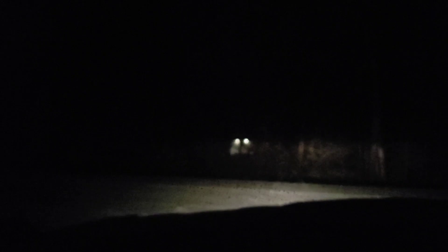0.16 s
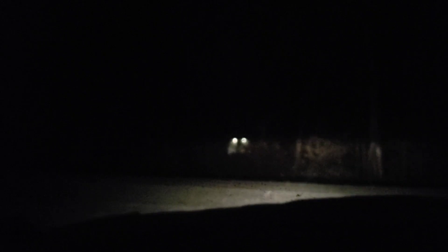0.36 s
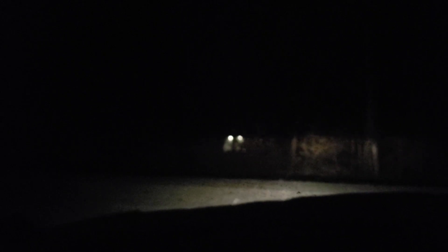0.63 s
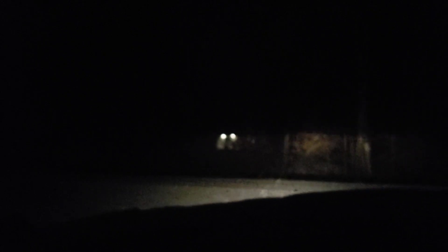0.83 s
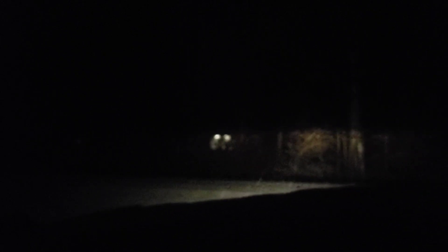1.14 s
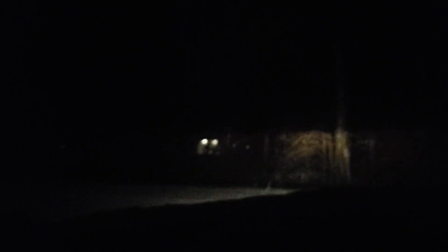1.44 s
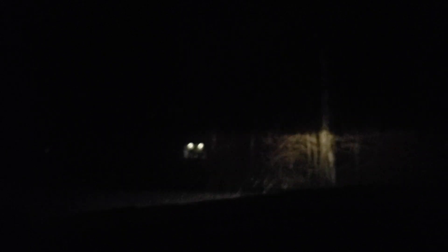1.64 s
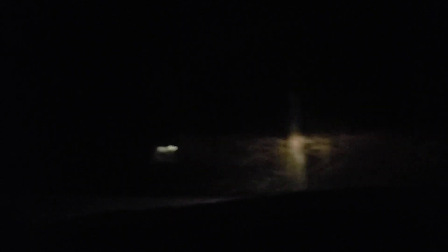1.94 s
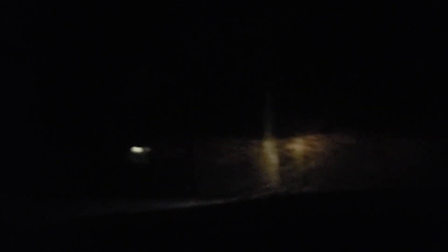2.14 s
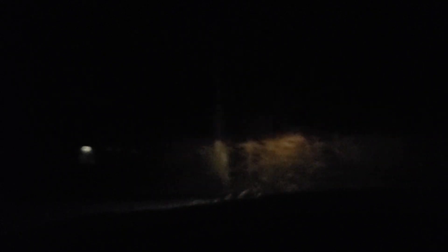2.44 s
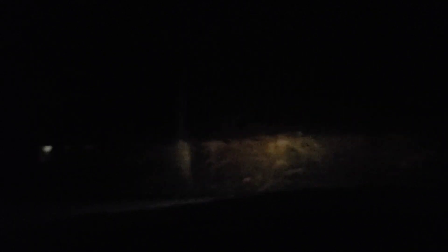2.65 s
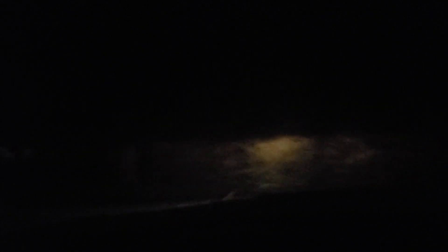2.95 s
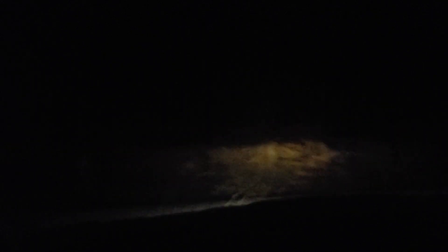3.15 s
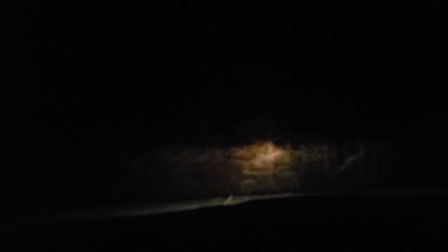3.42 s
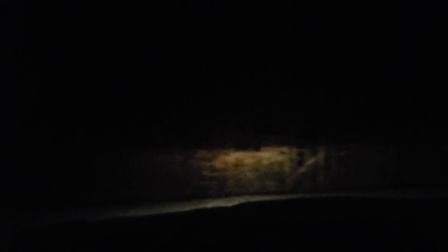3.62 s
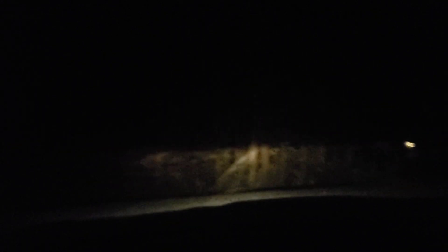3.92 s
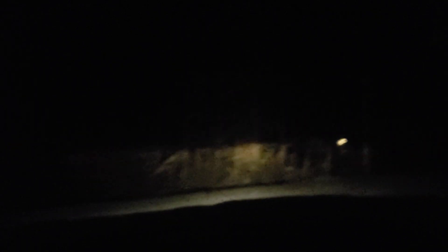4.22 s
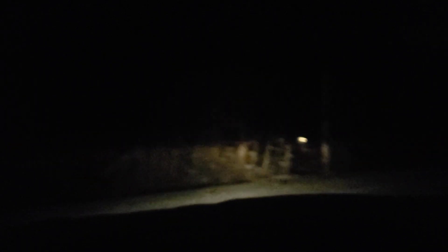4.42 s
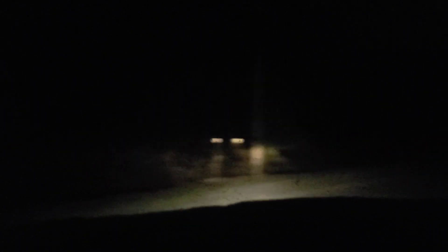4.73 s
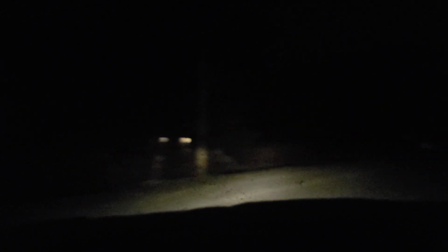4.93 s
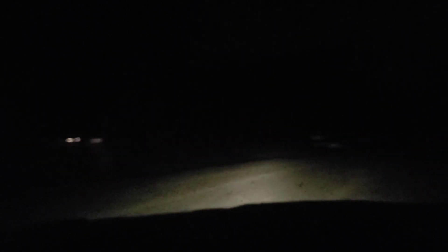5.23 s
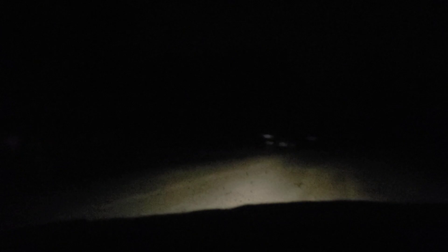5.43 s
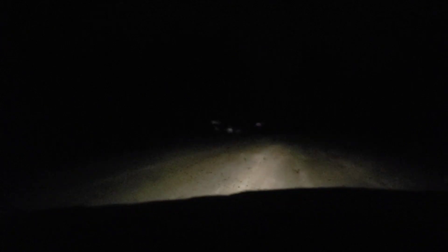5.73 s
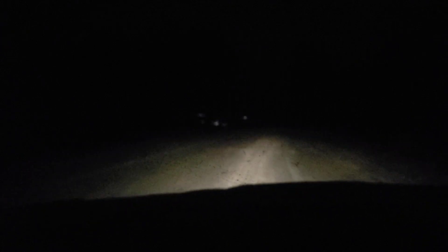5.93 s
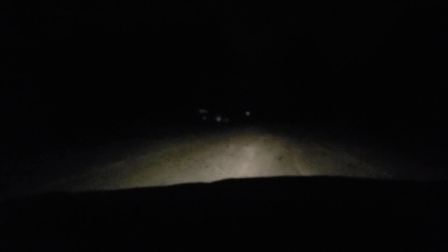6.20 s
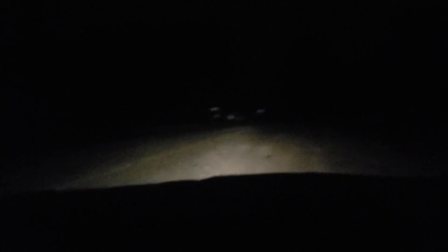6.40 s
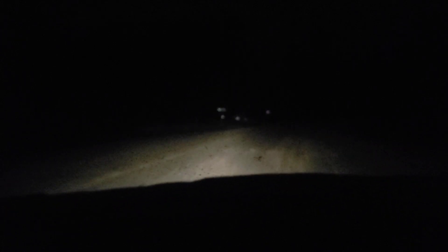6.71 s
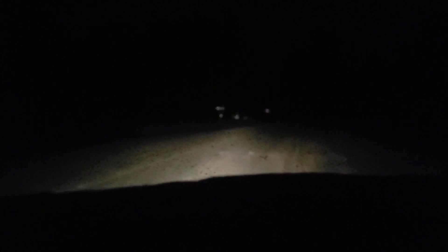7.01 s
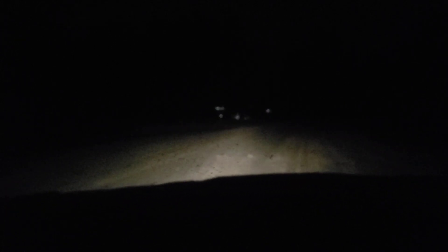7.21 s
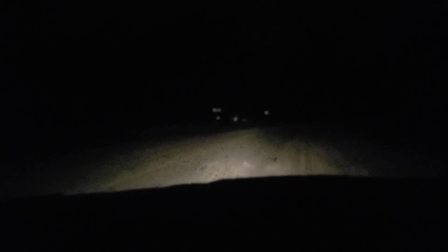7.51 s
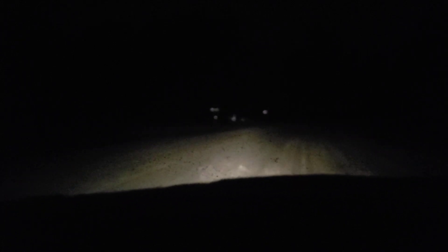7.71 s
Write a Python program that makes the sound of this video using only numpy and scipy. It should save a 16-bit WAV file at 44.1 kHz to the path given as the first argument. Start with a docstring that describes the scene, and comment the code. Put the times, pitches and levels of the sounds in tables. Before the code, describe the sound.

Low uneven cabin rumble of a car turning on snow, with boomy jolts, engine surges, faint crunch and a sharp underbody knock past halfway.

```python
"""Car on packed snow

Heard inside the car: ruts jolt the body into a low boom, tyre noise rings in the cabin and snow crunches.
The engine is a set of harmonics that rev up and down, with a thin whine and short growls.
A hum, a drone and a heater fan are pitched tones and coloured noise; snow spray and swishes are shaped noise.
Lumps of snow are bursts of noise that ring the underside; sharp icy ticks are brief bright bursts."""
import sys
import numpy as np
from scipy import signal
from scipy.fft import rfft, irfft
from scipy.io import wavfile
from scipy.ndimage import uniform_filter1d

SR = 44100
rng = np.random.default_rng(int(sys.argv[2]) if len(sys.argv) > 2 else 0)


def digitize_waveform(pressure):
    """Quantize a signal to 16-bit integers and store it at the path in sys.argv[1].

    Rows of a 2-D input are taken as channels; values are limited to [-1, 1].
    """
    field = np.atleast_2d(pressure).T
    bounded = np.clip(field, -1, 1)
    quanta = np.round(bounded * 32767).astype(np.int16)
    wavfile.write(sys.argv[1], SR, quanta)


N = 346626
TIME = np.arange(N) / SR
BINS = np.maximum(np.fft.rfftfreq(N, 1 / SR), 1)   # the frequencies of a spectrum, in Hz
OPPOSITE = np.array([[1], [-1]])   # left and right move against each other


def from_db(db):
    """Turn decibels into gain."""
    return np.exp(np.asarray(db) * (np.log(10) / 20))


def rms_one(x):
    """Scale a sound to an average power of 1."""
    return x / np.sqrt(np.mean(x ** 2) + 1e-20)


def power_sum(levels):
    """Join levels by adding their powers."""
    return np.sqrt(sum(level ** 2 for level in levels))


def in_time(rows):
    """Join the points of each column with straight lines, giving a value at every sample."""
    s, *columns = np.transpose(rows)
    return [np.interp(TIME, s, column) for column in columns]


def at_bins(points):
    """Join the points of a table over frequency on a log axis."""
    hz, value = np.transpose(points)
    return np.interp(np.log(BINS), np.log(hz), value)


def pan(left_db):
    """Gains of the two sides for a left-minus-right level."""
    half_db = np.atleast_1d(left_db) / 2
    return np.array([from_db(half_db), from_db(-half_db)])


def drift(rate, size=8):
    """Smooth chance of spread 1 that changes about rate times a second."""
    white = rfft(rng.standard_normal(N // size))   # worked out at every 8th sample
    slow = rms_one(irfft(white / (1 + (BINS[:len(white)] / rate) ** 4)))
    return np.interp(np.arange(N) / size, np.arange(len(slow)), slow)


def flutter(rate):
    """A wandering complex amplitude: strength and phase both change about rate times a second."""
    return (drift(rate) + 1j * drift(rate)) / np.sqrt(2)


def grains(per_s, spread_db):
    """The fluttering strength of many small fractures; rms 1."""
    return rms_one(from_db(spread_db * drift(per_s)))


# how alike left and right are: (f/Hz, correlation)
LIKENESS = [(30, 1), (200, 0.86), (350, 0.61), (700, 0.55), (1300, 0)]


def noise(spectrum, resonances=()):
    """Stereo noise of a given colour, alike on both sides in the bass; rms 1."""
    level_db = at_bins(spectrum)
    for hz, width, db in resonances:
        level_db = level_db + db / (1 + (2 * (BINS - hz) / width) ** 2)
    low_skirt = np.minimum(1, BINS / spectrum[0][0]) ** 2
    high_skirt = np.minimum(1, spectrum[-1][0] / BINS) ** 2
    alike = np.clip(at_bins(LIKENESS), -1, 1)
    mid, side = rfft(rng.standard_normal((2, N))) * from_db(level_db) * low_skirt * high_skirt
    return rms_one(irfft(np.sqrt(1 + alike) * mid + np.sqrt(1 - alike) * side * OPPOSITE, N))


def resonate(x, hz, width):
    """A two-pole resonance with gain 1 on top."""
    r = np.exp(-np.pi * width / SR)
    top = np.array([1, 0, -1]) * (1 - r * r) / 2
    bottom = [1, -2 * r * np.cos(2 * np.pi * hz / SR), r * r]
    return signal.lfilter(top, bottom, x + 1e-18)


def resonate_twice(x, hz, width):
    """A narrow resonance followed by one twice as wide at the same pitch."""
    return resonate(resonate(x, hz, width), hz, 2 * width)


def below(x, hz):
    """The part of a sound below a frequency."""
    return irfft(rfft(x) / (1 + (BINS / hz) ** 10), N)


def evened(x, seconds):
    """Take the slow swells out of a noise."""
    power = uniform_filter1d(np.mean(x ** 2, axis=0), max(int(seconds * SR), 2))
    return x / np.sqrt(power + 1e-12)


def burst(start, t60, rise):
    """A quick rise and an exponential fall of 60 dB in t60 seconds."""
    age = np.maximum(TIME - start, 0)
    return (1 - np.exp(-age / rise)) * from_db(-np.minimum(60 * age / t60, 200))


def arch(start, length, shape, skew=0.74):
    """A swell and fade that peaks a little early; a higher shape makes it more pointed."""
    through = np.linspace(0, 1, num=200)
    swell = np.abs(np.sin(np.pi * through ** skew)) ** shape
    return np.interp(TIME, start + length * through, swell)


# tyres rolling: (t/s, rumble level/dB, tread roar level/dB)
ROLLING = [(0, -34, -50), (.4, -40.5, -51.5), (1.2, -37.5, -47.5), (1.9, -30, -41.5), (2.55, -29, -42),
           (3.1, -37, -47), (3.45, -36, -40.5), (4.05, -38, -47), (4.55, -35, -42), (5.55, -36.5, -41),
           (6.3, -40.5, -49.5), (6.6, -33.5, -46), (6.95, -42.5, -48.5), (7.18, -32, -49), (7.4, -39, -49),
           (7.86, -39, -44.5)]
# cabin resonances that lift the roar: (f/Hz, width f/Hz, lift level/dB)
CABIN = [(189, 61, 3.5), (292.7, 9, 6), (373.5, 47, 4.5), (557, 130, 6), (817, 77, 7.5)]
# colours of rumble, roar and crunch: (f/Hz, relative level/dB per Hz)
RUMBLE = [(60, -4), (78, 5.5), (105, 0), (130, -5), (170, -19), (220, -32.5)]
ROAR = [(120, 0), (155, 2), (220, 1.5), (340, -9.5), (770, -16), (880, -19), (1000, -26.5), (1400, -52)]
CRUNCH = [(700, -3.5), (1200, 4.5), (1560, -5.5), (1850, -2), (2500, -8), (3200, -24), (9000, -41)]
CRUNCH_DB, CRUNCH_FOLLOWS = -73.5, 1.41   # level at mean tread roar; dB of crunch per dB of roar


def tyres():
    """Low rumble, and roar that rings in the cabin; snow crunches more the harder the tread works."""
    rumble_db, roar_db = in_time(ROLLING)
    crunch_db = CRUNCH_DB + CRUNCH_FOLLOWS * (roar_db - roar_db.mean())
    rumble = from_db(rumble_db) * evened(noise(RUMBLE), seconds=0.074)
    roar = from_db(roar_db) * evened(noise(ROAR, CABIN), seconds=0.23) * grains(per_s=8.4, spread_db=0.14)
    crunch = from_db(crunch_db) * pan(left_db=3.5) * noise(CRUNCH) * grains(per_s=25, spread_db=2.0)
    return rumble + roar + crunch


JOLT_ATTACK_S, JOLT_T60_S = 0.0179, 0.3164   # width of the bell-shaped attack; time to fall 60 dB


def jolt(start, hold):
    """A wheel drops into a rut: quick attack, hold, exponential release."""
    attack = np.exp(-.5 * (np.minimum(TIME - start, 0) / JOLT_ATTACK_S) ** 2)
    return attack * from_db(-np.clip(60 * (TIME - start - hold) / JOLT_T60_S, 0, 200))


# ruts, timed at the front wheels: (t/s, front level/dB, rear level/dB, hold t/s)
RUTS = [(1.453, -26, -28.5, 0.026), (1.759, -25, -23, 0.0082), (1.998, -21.5, -21.5, 0.014),
        (2.248, -20.5, -17, 0.0087), (3.469, -18.5, -22, 0.067), (3.583, -21, -23.5, 0.023),
        (4.33, -21, -23, 0.0065), (4.401, -26.5, -20, 0.0077), (4.793, -17, -21, 0.067),
        (4.94, -22, -25, 0.037), (5.497, -24, -44, 0.012), (6.615, -30, -39, 0.027),
        (7.14, -29, -28, 0.042)]
# the body's steady shaking between ruts: (t/s, level/dB)
SHAKE = [(0, -46), (.95, -48), (1.3, -34.5), (2.6, -31), (3.2, -39.5), (5.4, -32.5), (5.75, -39.5),
         (6.9, -39.5), (7.86, -28.5)]
AXLE_DELAY_S = 0.3786   # from the front wheels to the rear


def body(boom_hz=55.1, sag_hz=9.0, wander_hz=14.4, steady_s=0.036, side_db=-22):
    """Each rut jolts the body once per axle; it booms with wandering phase, lower in pitch when hit hard."""
    shake_db, = in_time(SHAKE)
    levels = [from_db(shake_db)]
    for s, front_db, rear_db, hold in RUTS:
        levels.append(from_db(front_db) * jolt(s, hold))
        levels.append(from_db(rear_db) * jolt(s + AXLE_DELAY_S, hold))
    strength = power_sum(levels)
    pitch_hz = boom_hz - sag_hz * np.sqrt(strength / strength.max())
    phase = 2 * np.pi * np.cumsum(pitch_hz) / SR
    sway = drift(wander_hz) + 1j * drift(wander_hz)
    sway_power = uniform_filter1d(np.abs(sway) ** 2, max(int(steady_s * SR), 2))
    sway = sway / np.sqrt(sway_power + 1e-9)
    heave = np.sqrt(2) * np.real(sway * np.exp(1j * phase))
    roll = from_db(side_db) * drift(wander_hz) * np.sqrt(2) * np.sin(phase)
    return strength * (heave + roll * OPPOSITE)


# engine speed: (t/s, firing f/Hz)
ENGINE = [(0, 73.4), (.95, 94), (2.04, 91), (2.42, 118), (2.54, 118), (2.8, 95), (3.12, 86), (3.48, 118),
          (3.62, 113), (4.0, 72), (4.3, 85), (4.65, 132), (5.0, 118), (5.55, 126), (6.04, 105), (6.3, 88),
          (6.55, 97), (6.9, 98), (7.1, 88), (7.3, 95), (7.86, 101)]
# how hard the engine pulls: (t/s, level/dB)
LOAD = [(0, -63), (1.0, -38.5), (2.0, -30), (2.6, -29), (3.05, -48), (3.5, -38), (4.0, -43), (4.55, -32),
        (5.0, -41), (5.25, -36.5), (6.3, -51.5), (7.2, -38.5), (7.86, -46.5)]
# cabin resonances set booming by the third harmonic: (f/Hz, width f/Hz, level/dB before the load acts)
BOOMS = [(300.5, 13.8, -46.5), (368.5, 18, -54)]
# the geared whine sings out as the engine revs: (start t/s, length t/s, level/dB)
WHINES = [(2.02, .82, -56), (3.18, 0.6, -55.5), (5.36, .88, -57.5)]
# the engine growls as the throttle opens: (start t/s, length t/s, level/dB before the throb)
GROWLS = [(1.822, 0.22, -40.5), (3.275, 0.39, -46.5), (4.433, 0.29, -39.5)]
# colour of the growl: (f/Hz, relative level/dB per Hz)
GROWL_COLOUR = [(200, 5), (350, -7.5), (430, -12), (520, -17.5)]
ENGINE_INERTIA_S = .12   # the flywheel rounds off changes of speed
WHINE_SHAPE = .25   # a flat-topped swell


def engine(whine_order=5.45, rough_db=2.5, second_db=-19, third_db=-27, whine_rough=0.2, throb=0.55):
    """Firing harmonics, the third booming at cabin resonances; a geared whine; a throttle growl."""
    firing_hz = uniform_filter1d(in_time(ENGINE)[0], int(ENGINE_INERTIA_S * SR))
    load_db, = in_time(LOAD)
    phase = 2 * np.pi * np.cumsum(firing_hz * (1 + 0.0038 * drift(13.6))) / SR
    second, third = np.sin(2 * phase), np.sin(3 * phase)
    note = np.sin(phase) + from_db(second_db) * second + from_db(third_db) * third
    rough_note = from_db(load_db) * note * grains(per_s=4.3, spread_db=rough_db)

    # the boom follows only half of the load's change in dB
    drive = third * from_db((load_db - load_db.max()) / 2) * np.abs(flutter(11))
    boom = sum(from_db(db) * resonate(resonate(drive, hz, width), hz, width) for hz, width, db in BOOMS)

    singing = sum(from_db(db) * arch(s, length, WHINE_SHAPE) for s, length, db in WHINES)
    whine = singing * np.real((1 + whine_rough * flutter(25)) * np.exp(1j * whine_order * phase))

    throttle = sum(from_db(db) * arch(s, length, 0.79) for s, length, db in GROWLS)
    growl = throttle * (1 + throb * np.sin(phase)) * evened(noise(GROWL_COLOUR), seconds=0.038)
    return np.sqrt(2) * (rough_note + boom + whine) + growl


# drivetrain hum: (t/s, peak level/dB before its flutter, f/Hz)
HUM = [(0, -67, 760.5), (1.1, -69, 766), (1.5, -69.5, 827.7), (5.0, -63.5, 827.5), (7.47, -70, 816),
       (7.58, -58.5, 806), (7.86, -56, 845)]


def hum(rough=.75):
    """A thin drivetrain tone, unsteady in strength and phase, near the cabin's highest resonance."""
    level_db, hz = in_time(HUM)
    phase = 2 * np.pi * np.cumsum(hz) / SR
    return from_db(level_db) * np.real((1 + rough * flutter(16)) * np.exp(1j * phase))


# low drone: (t/s, level/dB)
DRONE = [(0, -45.5), (1.9, -45), (6.8, -66), (7.6, -46)]


def drone(centre_hz=166, width_hz=45):
    """A low hollow drone of the cabin air: noise through a resonance, fading and then returning."""
    level_db, = in_time(DRONE)
    air = resonate_twice(rng.standard_normal(N), centre_hz, width_hz)
    return from_db(level_db) * evened(rms_one(air)[None], seconds=0.099)


# colour of the fan's hiss: (f/Hz, relative level/dB per Hz)
FAN = [(1550, -1.5), (1850, 15.5), (2500, 7.5), (3400, -1.5), (4000, 9), (4500, -5), (7500, -6),
       (9000, -30.5), (16000, -11.5)]


def fan(level_db=-80.0, left_db=12, tone_db=-65, tone_hz=560, tone_width_hz=34):
    """The heater: a faint steady hiss from a vent on the left, and a hollow tone of resonant noise."""
    tone = resonate_twice(rng.standard_normal(N), tone_hz, tone_width_hz)
    hiss = from_db(level_db) * pan(left_db) * noise(FAN)
    return hiss + from_db(tone_db) * evened(rms_one(tone)[None], seconds=0.17)


# patches of loose snow thrown into the wheel arches:
# (start t/s, length t/s, level/dB, sizzle level/dB relative to the patch, sizzle left-minus-right level/dB)
SPRAY = [(0.357, 0.91, -66.5, -6, 2), (1.409, 0.44, -56.5, -1, -8.5), (1.85, 0.7, -69.5, 1.5, 3),
         (2.214, 0.29, -59.5, -1, 1), (3.246, 0.61, -59.5, 0, 1.5), (4.445, 0.81, -59.5, -.5, 1),
         (4.996, .14, -54.5, -3, 1), (5.082, 0.24, -61, 5, 1), (5.287, 0.17, -61.5, 1, 0),
         (5.387, 0.96, -71, -3, 1), (6.29, 1.32, -70.5, -2, 3.5)]
# sharp icy ticks: (t/s, level/dB before the burst's fall)
TICKS = [(4.771, -40.5), (5.188, -43.5), (5.221, -46)]
# colours of spray and ice: (f/Hz, relative level/dB per Hz)
SPRAY_COLOUR = [(1200, -8), (2600, -7), (4000, 1.5), (7500, -1), (9300, -4), (12300, 4), (15800, -3.5)]
ICE_COLOUR = [(3000, -19), (8500, 3), (16000, 7.5)]
SPRAY_SHAPE = 1.7   # each patch swells to a rounded point
POWDER_DB = -81.5   # fine powder thrown up all the time


def spray(split_hz=8500, hiss_left_db=5.0):
    """Fine snow hisses in the arches, its top sizzle from either side, with a few sharper ticks of ice."""
    flows, sizzles = [from_db(POWDER_DB)], [from_db(POWDER_DB)]
    for s, length, db, top_db, left_db in SPRAY:
        patch = from_db(db) * arch(s, length, SPRAY_SHAPE)
        flows.append(patch)
        sizzles.append(patch * from_db(top_db) * pan(left_db))
    snow = grains(per_s=120, spread_db=1.0) * grains(per_s=37, spread_db=0.53) * noise(SPRAY_COLOUR)
    hiss = below(snow, split_hz)
    sizzle = snow - hiss
    ticks = sum(from_db(db) * burst(s, t60=0.072, rise=0.0003) for s, db in TICKS)
    spread_hiss = power_sum(flows) * pan(hiss_left_db) * hiss
    return spread_hiss + power_sum(sizzles) * sizzle + ticks * noise(ICE_COLOUR)


# soft sliding swishes: (t/s, width t/s, level/dB before panning, centre f/Hz, bandwidth f/Hz)
SWISHES = [(.74, 0.064, -62, 4760, 900), (.78, 0.11, -73, 1900, 300), (0.77, 0.11, -67.5, 6340, 2200),
           (.98, 0.089, -70.5, 4840, 1720), (1.4, 0.098, -70, 5260, 3570), (1.613, 0.055, -67, 3130, 1800),
           (3.896, 0.017, -72.5, 5400, 2940), (5.9, 0.04, -76, 4870, 1200), (6.35, .04, -76, 3070, 1100),
           (6.45, 0.06, -73.5, 3850, 1590), (6.555, 0.05, -69.5, 4460, 1090), (7.0, .02, -75, 5360, 1100)]


def swishes(left_db=10.0, top_hz=8000):
    """Soft, grainy rubbing on the left that swells and fades, each stroke around its own resonance."""
    strokes, friction = 0, rng.standard_normal((2, N))
    for s, width, db, hz, band_hz in SWISHES:
        rub = rms_one(resonate_twice(friction, hz, band_hz))
        swell = np.exp(-.5 * np.minimum(((TIME - s) / width) ** 2, 10 ** 2))
        strokes = strokes + from_db(db) * swell * rub
    dulled = signal.sosfilt(signal.butter(6, top_hz, fs=SR, output="sos"), strokes)
    return pan(left_db) * dulled * grains(per_s=63, spread_db=1.0)


# stretches of crusty snow that break under the tread: (start t/s, length t/s, level/dB)
CRUSTS = [(1.84, 0.15, -72), (4.9, 0.77, -64.5), (5.65, 0.71, -71)]
# colour of the breaking crust: (f/Hz, relative level/dB per Hz)
CRUST_COLOUR = [(1300, 1), (3000, -10.5), (4500, -14.5)]


def crust():
    """Where the snow has a crust it breaks in a dense, uneven wash of grains."""
    breaking = sum(from_db(db) * arch(s, length, 0.82) for s, length, db in CRUSTS)
    fractures = grains(per_s=31, spread_db=0.5) * grains(per_s=300, spread_db=2.5)
    return breaking * noise(CRUST_COLOUR) * fractures


# lumps of snow striking the underside: (t/s, level/dB, panel level/dB and treble level/dB relative to
# the lump, rise t/s, t60 t/s, struck spot f/Hz)
LUMPS = [(3.846, -47.5, -13, -0.5, .001, 0.11, 1035), (4.708, -47, 3, -12, 0.0075, 0.3, 1200),
         (4.731, -38.5, -4.5, -1, .008, 0.23, 430), (4.7485, -32, 2.5, -1, 0.0021, 0.17, 704),
         (4.7713, -28.5, -1.5, -1, 0.0012, 0.089, 190), (4.793, -32, 1.5, -2.5, 0.0031, 0.087, 413),
         (5.435, -48.5, -10, -6, 0.0014, 0.14, 1160), (5.706, -51.5, -18, 2.5, 0.00095, 0.09, 1563),
         (6.615, -53.5, -16, 4, .001, 0.07, 1250), (6.843, -59, -21, -3, .003, 0.12, 1820)]
# colour of the crumbling: (f/Hz, relative level/dB per Hz)
LUMP_COLOUR = [(400, -3.5), (1100, 4), (1700, -5), (3200, -13.5), (5600, -13.5), (10400, -26.5),
               (11800, -11.5), (13500, -35.5)]
# underbody panel resonances: (f/Hz, width f/Hz, relative level/dB)
PANEL = [(122.5, 28, 3.5), (190, 23, -3.5), (288.4, 45.6, -2.5), (396.5, 25, -2), (449, 24, -5),
         (730, 81, -15.5), (2030, 78, -11.5), (2750, 690, -3), (3500, 670, -4.5)]
SPOT_DB, SPOT_WIDTH_HZ = -5.5, 160   # ring of the struck spot, relative to the lump


def lumps(panel_db=2.0, side_share=0.6, crack_tilt_db=-0.5, treble_hz=4000):
    """Lumps crumble in bursts of fractures, ring the spot they strike and shake the underbody panel."""
    _, _, weights_db, trebles_db, _, _, spots_hz = np.transpose(LUMPS)
    crumbling = [from_db(db) * burst(s, t60, rise) for s, db, _, _, rise, t60, _ in LUMPS]
    fractures = evened(grains(per_s=700, spread_db=3.8)[None], seconds=0.008)

    grit = noise(LUMP_COLOUR) * fractures
    dull = below(grit, treble_hz)
    sharpness = power_sum(c * from_db(db) for c, db in zip(crumbling, trebles_db))
    crack = power_sum(crumbling) * dull + sharpness * (grit - dull)

    push = power_sum(c * from_db(db) for c, db in zip(crumbling, weights_db))
    mid, side = rng.standard_normal((2, N))
    force = fractures * (mid + side_share * side * OPPOSITE)
    # a narrow resonance lets little noise through, so the square roots make up its level
    spots = sum(resonate(c * force, hz, SPOT_WIDTH_HZ) for c, hz in zip(crumbling, spots_hz))
    spots = spots * np.sqrt(SR / (np.pi * SPOT_WIDTH_HZ))
    blows, ring = push * force, 0
    for hz, width, db in PANEL:
        ring = ring + from_db(db) * np.sqrt(SR / (np.pi * width)) * resonate(blows, hz, width)
    # carpet dulls the ring
    muffled = signal.sosfilt(signal.butter(2, 1600, fs=SR, output="sos"), ring)
    return crack * from_db(crack_tilt_db * OPPOSITE) + from_db(SPOT_DB) * spots + from_db(panel_db) * muffled


LEFT_DB = 1.09   # the cabin's left side is raised and its right side lowered by this much


def scene():
    """The cabin sounds meet, a little louder on the left; the spray keeps its own balance."""
    cabin = tyres() + body() + engine() + hum() + drone() + fan() + swishes() + crust() + lumps()
    return cabin * from_db(LEFT_DB * OPPOSITE) + spray()


CUTOFF_HZ = 15700


def record(dry):
    """The microphone loses the deepest bass; the ends are eased and the top is cut."""
    thinned = signal.sosfilt(signal.butter(4, 25, "high", fs=SR, output="sos"), dry)
    eased = thinned * np.minimum(1, np.minimum(TIME, TIME[-1] - TIME) / .004)   # 4 ms fades
    return signal.sosfilt(signal.ellip(10, .2, 80, CUTOFF_HZ, fs=SR, output="sos"), eased)


dry = scene()
out = record(dry)
digitize_waveform(out)
```